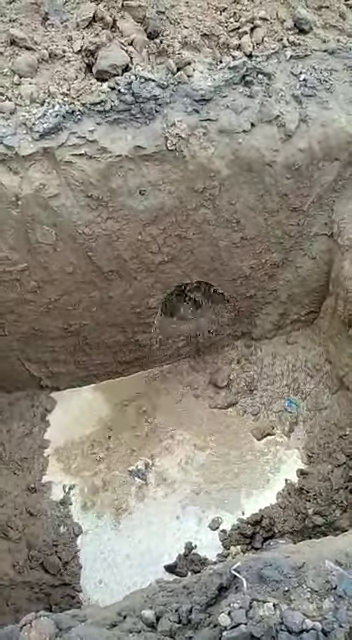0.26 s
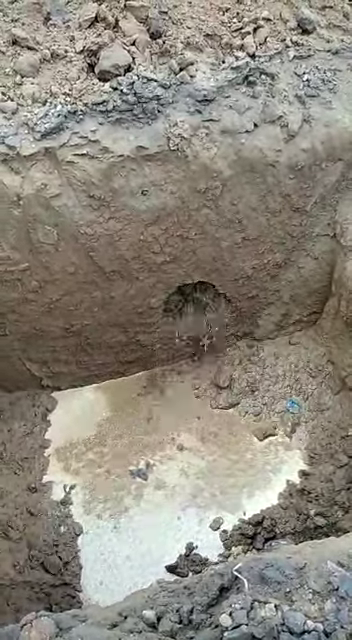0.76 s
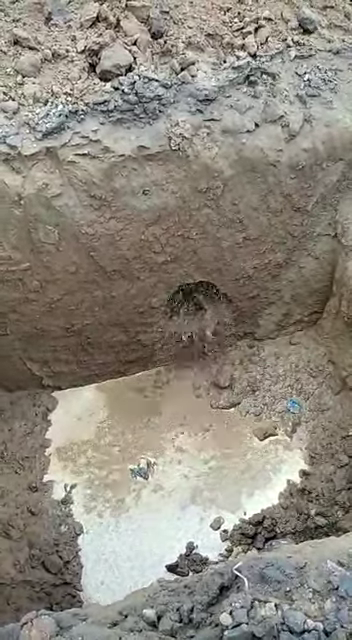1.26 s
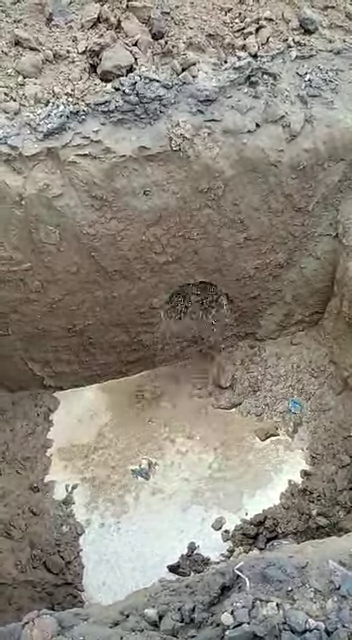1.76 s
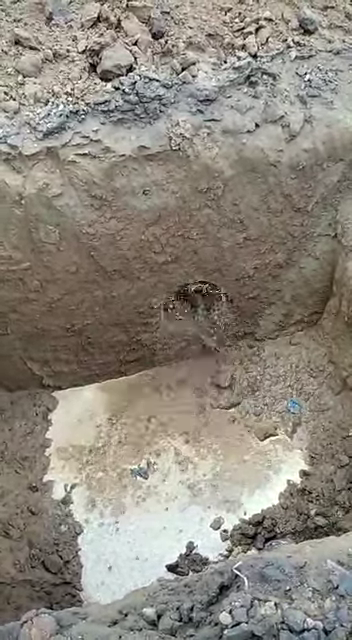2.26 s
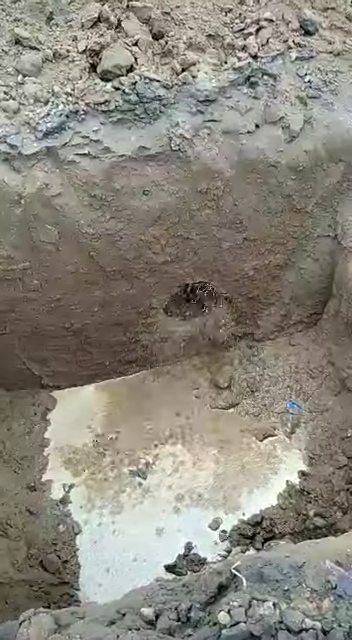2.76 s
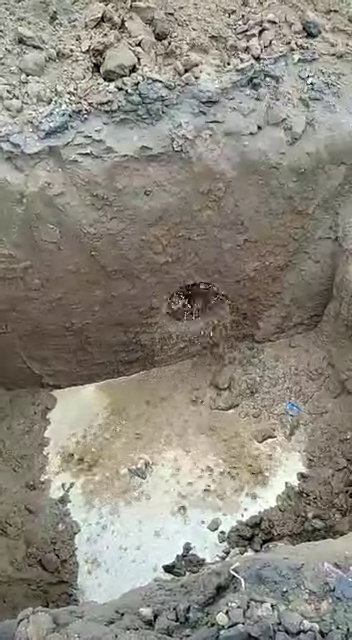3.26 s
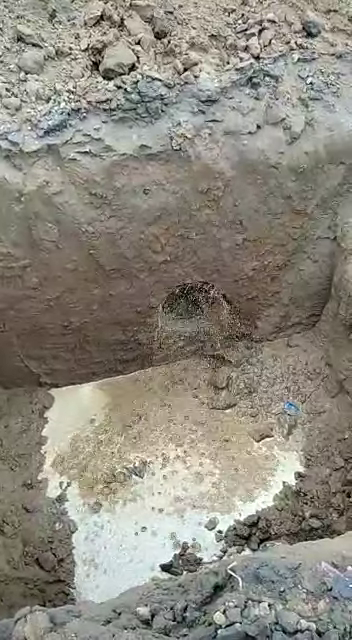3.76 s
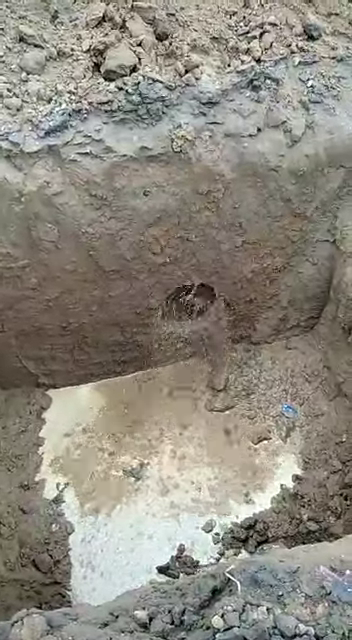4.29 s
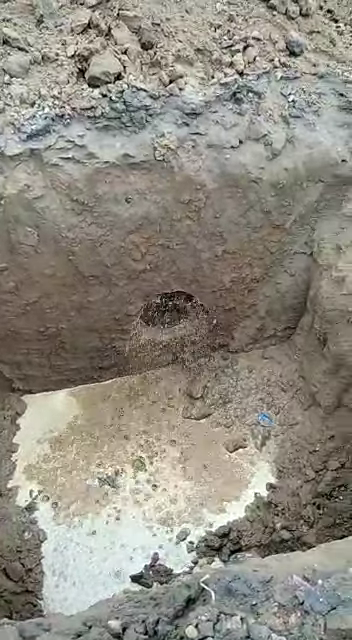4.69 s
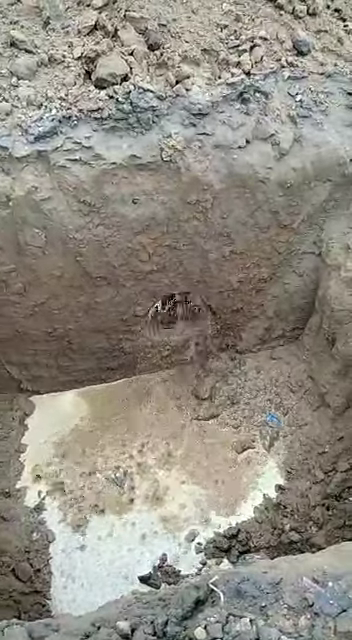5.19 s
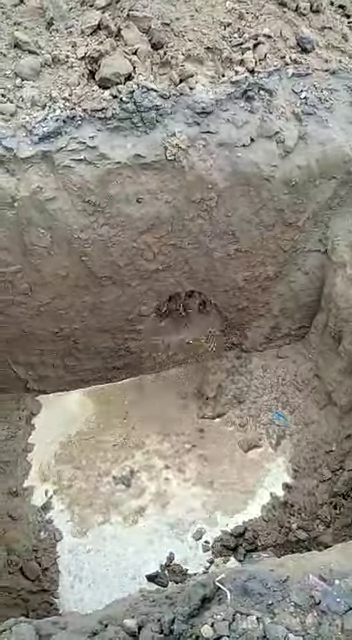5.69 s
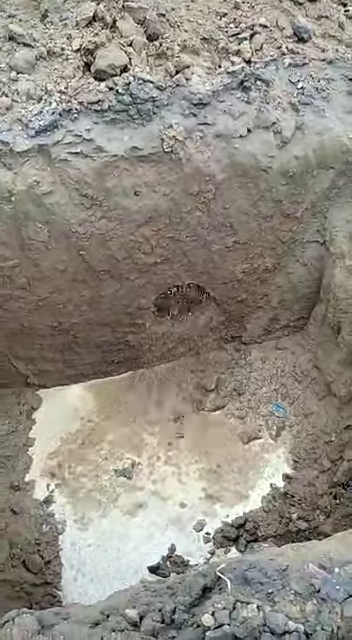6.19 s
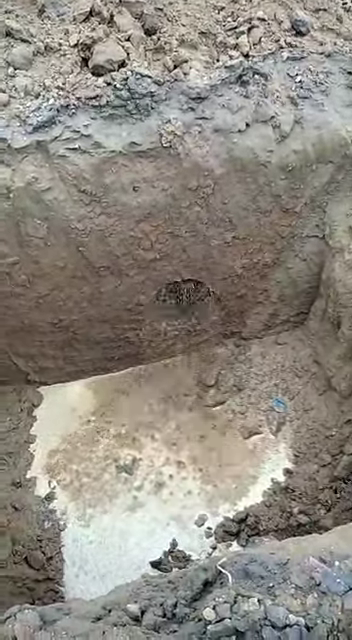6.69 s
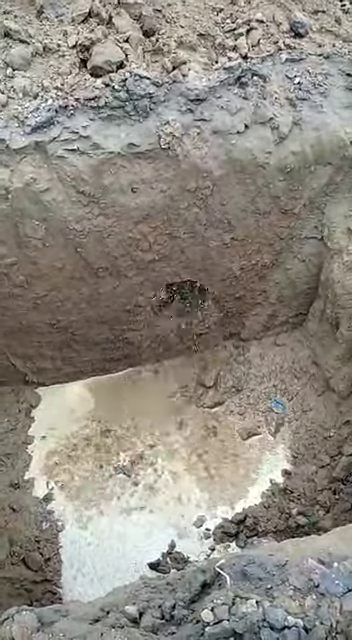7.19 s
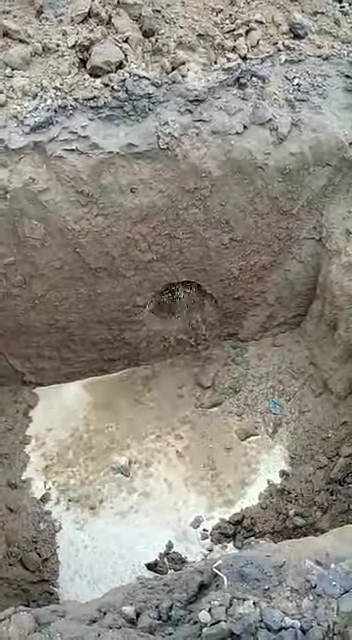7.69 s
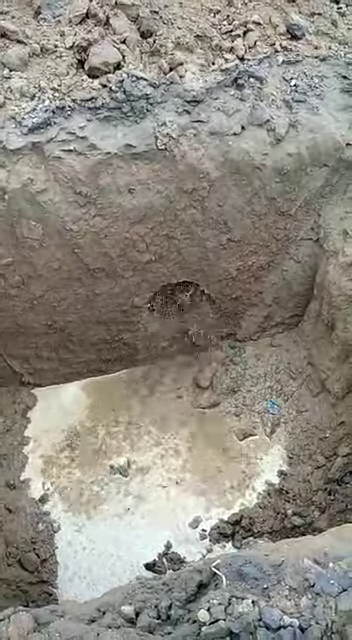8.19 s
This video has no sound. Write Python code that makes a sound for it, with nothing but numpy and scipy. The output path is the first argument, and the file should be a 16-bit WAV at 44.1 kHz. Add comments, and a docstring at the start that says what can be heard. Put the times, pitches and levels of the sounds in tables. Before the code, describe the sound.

Close above a muddy pit, a pneumatic hammer strikes about eleven times a second. Each stroke is a bright, spitting burst of air with a short hollow bark and a trailing wet spray, over a dull ground thud. Small drops and clods plop in a puddle. Around five seconds mud chokes the hole, the hiss drops away and a low boom swells, then the spitting returns. An engine hums steadily beneath broad outdoor noise.

```python
"""Boring hammer in a muddy pit

A pneumatic boring head hammers through wet ground about eleven times a second, heard from above its muddy pit.
Each stroke rings the soil (fading sine waves) and blows air out of the bore hole (shaped noise): a bark, a
spitting jet, then spray. Drops and clods plop in a puddle, with low knocks (short rising tones). Mud chokes the
hole for a moment and the ground booms after it, as a low noise. Wavering tones make an engine's hum over broad
roadside noise."""
import sys
import numpy as np
from scipy import signal
from scipy.fft import rfft, irfft
from scipy.io import wavfile
from scipy.ndimage import uniform_filter1d

SR = 44100
rng = np.random.default_rng(int(sys.argv[2]) if len(sys.argv) > 2 else 0)


def int16_out(signal):
    """Quantize to a 16-bit WAV file."""
    q = np.round(np.clip(np.atleast_2d(signal).T, -1, 1) * 32767)
    wavfile.write(sys.argv[1], SR, q.astype(np.int16))


N = 372644  # length of the scene, samples
PORT_LAG = 14  # samples by which the left microphone port hears the hole later than the right
PUFF_SIZE = 8192  # length of one puff, ring or bubble, samples
LEAD_S = .006  # room before the main burst for air that leaks early


def exhaust():
    """A puff of air for each stroke, as strong as the mud allows and never twice the same."""
    # air through the hole as mud narrows and clears it, before chance and the final trims in puff():
    # start_s, jet_db, spray_db, bark_db, brightness_db (of the hiss)
    mud_flow = [(0.02, -7.5, -26, -19.5, 1.5), (0.29, -12.5, -29, -25.5, -3), (0.38, -8, -24.5, -20, 1),
                (0.66, -12.5, -31.5, -23, -5.5), (1.12, -7.5, -21.5, -19.0, -4.5),
                (2.57, -11, -28.5, -23.5, -2.5), (3.2, -11.0, -27.5, -18.5, -1.5),
                (3.47, -11, -25.5, -30, -1), (3.65, -13.0, -31, -23.5, -2.5), (3.92, -10, -26, -26, 1),
                (4.64, -12.5, -30.5, -22.5, -1.5), (5.0, -26, -35.5, -22.5, -7),
                (5.18, -25, -38, -30.5, -3), (5.36, -13.0, -29.5, -21, -4.0), (5.99, -10, -25, -19.0, -1),
                (8.05, -8, -25, -20.5, 0.0), (8.23, -14.5, -33, -23, -4.0), (8.41, -7.5, -23, -20, 0.5)]
    # chance spread from one puff to the next, dB
    jet_spread, spray_spread, bark_spread, bright_spread, hollow_spread = 0.93, 1.24, 1.3, 2.34, 3.5
    hollow_middle_db = -0.8  # lowest resonances of the hole against its highest
    spray_t60_s, spray_t60_spread = 0.22, 0.23  # typical time to fall 60 dB; spread as a share of it
    out = np.zeros((2, N))
    flow = curve(mud_flow)
    for s in stroke_times():
        jet_db, spray_db, bark_db, bright_db = (c[int(s * SR)] for c in flow)
        push, wet, bark, bright, hollow, linger = rng.standard_normal(6)
        push_db = jet_spread * push  # a harder puff also throws more spray
        sound = puff(
            jet_db=jet_db + push_db,
            bright_db=bright_db + bright_spread * bright,
            bark_db=bark_db + bark_spread * bark,
            hollow_db=hollow_middle_db + hollow_spread * hollow,
            spray_db=spray_db + push_db + spray_spread * wet,
            spray_t60=spray_t60_s * np.exp(spray_t60_spread * linger))
        add(out, s - LEAD_S - .0005, sound)  # the burst begins half a millisecond before the stroke time
    return out


def puff(jet_db, bright_db, bark_db, hollow_db, spray_db, spray_t60):
    """One exhaust stroke: air leaks, the jet bursts through the mud, rings the hole and trails off as spray."""
    # colour of the jet's hiss: pitch_hz, level_db (relative)
    jet_colour = [(1000, -22.5), (3700, -20.5), (4750, -6.5), (5200, -1.5), (6400, 1), (7700, -1.5),
                  (8700, 0), (10500, -1.5), (12200, -2), (15300, -8.5)]
    # colour of the spray: pitch_hz, level_db (relative)
    spray_colour = [(400, -38), (900, -12.5), (1700, -8), (2800, -5.5), (4000, -8), (4850, -15), (5150, 1),
                    (7500, -1), (9200, 0), (10300, -4), (12400, 0), (15300, -8.5)]
    # resonances of the bore hole, before each puff shifts them: pitch_hz, width_hz (of one pass), level_db
    hole_modes = [(928, 210, -9.5), (1637, 370, 4), (2595, 757, -2.5)]
    t = np.arange(PUFF_SIZE) / SR - LEAD_S
    length, mouth, late = rng.standard_normal(3)

    # a choked, slow jet has a fuller middle
    choke = np.clip((-11 - jet_db) / 8, 0, 1)
    tint = [(3000, 4 * choke), (4200, 11 * choke),
            (5200, -bright_db / 2), (7500, -bright_db / 2), (11500, bright_db / 2)]
    hiss = shape(shape(spatter(grain_db=1.8), jet_colour), tint)
    jet = ripple(hiss, depth_db=3)
    leak = undb(-12.5) * swell(t + 0.006, rise=0.0074, hold=0, t60=0.0093)
    main_burst = swell(t, rise=0.0043, hold=0.0019 * np.exp(0.18 * length), t60=0.015)
    jet = burst(jet, leak + main_burst)

    # a hollow puff favours the lowest resonances; the mouth shifts them all in pitch
    air = shape(spatter(grain_db=3.0), [(1850, hollow_db / 2), (2250, -hollow_db / 2)])
    shift = np.exp(0.053 * mouth)
    bark = sum(undb(db) * resonate(air, hz * shift, width) for hz, width, db in hole_modes)
    bark = burst(bark, swell(t - .0005 - 0.0024 * late, rise=0.0023, hold=0.003, t60=0.071))

    wet_hiss = shape(shape(spatter(grain_db=3.2, channels=2), spray_colour), tint)
    spray = ripple(wet_hiss, depth_db=3.2)
    # the spray leaves in uneven gobs, and its low part dies first
    gobs = undb(1.3 * np.interp(t, np.linspace(0, t[-1], 32), rng.standard_normal(32)))
    spray = burst(spray * gobs, swell(t, rise=0.016, hold=0.01, t60=max(spray_t60, .05)))
    low_part = shape(spray, [(4800, 0), (5150, -42)])
    spray = spray - low_part * (1 - np.exp(-t / 0.12))

    jet_heard = undb(jet_db - 1.0) * in_pit(jet, scatter=0.83)
    bark_heard = undb(bark_db - 0.2) * in_pit(bark, scatter=0.45)
    return jet_heard + bark_heard + undb(spray_db + 5.0) * spray


def spatter(grain_db, channels=1, size=12):
    """Air full of droplets: noise in tiny grains (size in samples) of uneven strength."""
    grains = undb(grain_db * rng.standard_normal((channels, PUFF_SIZE // size + 1)))
    strength = np.repeat(grains, size, axis=1)[:, :PUFF_SIZE]
    return unit(rng.standard_normal((channels, PUFF_SIZE)) * strength)


def ripple(x, depth_db, count=48):
    """Random peaks and dips across the pitch range, drawn anew for each puff's hiss."""
    hz = np.linspace(800, 16000, count)
    return shape(x, np.column_stack([hz, depth_db * rng.standard_normal(count)]))


def burst(x, opening):
    """Noise let through an opening, with a set energy whatever its grain."""
    return unit(x * opening) * np.sqrt(np.mean(opening ** 2))


def in_pit(x, scatter):
    """The right port hears the hole first; the pit's walls give each port its own early echoes."""
    t = np.arange(PUFF_SIZE // 8) / SR
    walls = rng.standard_normal((2, len(t))) * swell(t, rise=0.00097, hold=0.00027, t60=0.052)
    walls = walls / np.sqrt(np.sum(walls ** 2) / 2)
    echoes = signal.fftconvolve(x, walls, axes=1)[:, :PUFF_SIZE]
    direct = np.vstack([np.roll(x, PORT_LAG), x])
    return (direct + scatter * echoes) / np.hypot(1, scatter)


def stroke_times():
    """One stroke, in seconds, each time the piston completes a cycle."""
    # pace of the piston, which labours briefly near the start: start_s, strokes_per_s
    piston_pace = [(0.0, 11.1552), (0.9, 10.644), (1.8, 11.1061), (2.4, 11.1635), (2.7, 11.1272),
                   (4.8, 11.1103), (5.1, 11.1682), (6.9, 11.1103), (8.45, 11.1806)]
    first_stroke_s = .0188
    cycles = np.cumsum(curve(piston_pace)[0]) / SR
    cycles = cycles - cycles[int(first_stroke_s * SR)]
    return np.interp(np.arange(int(cycles[-1]) + 1), cycles, np.arange(N) / SR)


def hammer():
    """Every stroke of the piston rings the same few ground modes, each a sine wave that dies away."""
    # what rings in the ground; the piston knocks again on its way back:
    # delay_s (counted from 6 ms before the stroke), pitch_hz, t60_s (fall by 60 dB), level_db (typical)
    ground_modes = [(.001, 81, 0.1, -33.5), (.001, 112, .12, -47), (.002, 273, 0.11, -41.5),
                    (.002, 158, 0.088, -43), (.03, 304, 0.083, -49), (.002, 216.6, 0.13, -45),
                    (.057, 244, 0.17, -39)]
    out = np.zeros(N)
    t = np.arange(PUFF_SIZE) / SR
    for s in stroke_times():
        for delay, hz, t60, db in ground_modes:
            ring = np.sin(2 * np.pi * hz * t) * swell(t, rise=0.0043, hold=0, t60=t60)
            add(out, s + delay - .006, undb(db + 0.9 * rng.standard_normal()) * ring)
    return out


def boom():
    """A low, rough rumble of the ground: noise around its deepest resonance."""
    noise = rng.standard_normal(N)
    low = resonate(noise, hz=73.4, width=63) + undb(-21) * resonate(noise, hz=70, width=62)
    # even out the strength over an eighth of a second
    strength = np.sqrt(uniform_filter1d(low ** 2, size=SR // 8) + 1e-18)
    quiet_db = -61  # level between the booms
    return low / strength * (undb(quiet_db) + booming()[0])


def booming():
    """Gains that the booms give to the rumble and to the engine's low hum."""
    # booms of the ground: start_s, rise_s, hold_s, t60_s (fall by 60 dB), rumble_db, hum_db (before its trim)
    boom_list = [(0.909, .035, .015, .14, -38, -50), (5.532, 0.22, 0.15, 0.57, -31, -24.5)]
    t = np.arange(N) / SR
    gains = np.zeros((2, N))
    for s, rise, hold, t60, rumble_db, hum_db in boom_list:
        gains += np.outer(undb([rumble_db, hum_db]), swell(t - s, rise, hold, t60))
    return gains


def puddle(count=500):
    """Drops and clods fall into the puddle, with low knocks among them: short tones that rise in pitch."""
    # clods plopping in, and low knocks near 250 Hz: start_s, pitch_hz (at first), level_db
    plops_and_knocks = [(1.041, 440, -30), (2.93, 860, -26.5), (3.47, 790, -31), (5.27, 926, -31),
                        (5.99, 930, -24), (6.22, 241, -38), (6.329, 253.6, -33), (6.519, 414, -29.5),
                        (6.55, 248, -35), (6.649, 266, -36), (6.99, 890, -29), (7.09, 932, -38),
                        (7.23, 244, -30), (7.256, 859, -22.5), (7.369, 252, -29), (7.70, 883, -26)]
    out = np.zeros((2, N))
    for when, pitch, size, side in rng.random((count, 4)):
        # most drops are small and quiet
        drop = undb(-43 + 11.0 * size ** 3) * bubble(hz=380 * 7 ** pitch, cycles=28)
        add(out, when * N / SR, np.outer(np.sqrt([side, 1 - side]), drop))
    for s, hz, db in plops_and_knocks:
        tone_burst = undb(db) * bubble(hz, cycles=18 + hz / 25)
        add(out, s, np.array([np.roll(tone_burst, PORT_LAG), tone_burst]))
    return out


def bubble(hz, cycles):
    """A pocket of air rings in the water and rises in pitch; cycles sets how long it rings."""
    turns = hz * np.arange(PUFF_SIZE) / SR
    rising = turns * (1 + 0.015 * turns / cycles)
    return np.sin(2 * np.pi * rising) * swell(turns, rise=1, hold=0, t60=cycles)


def engine():
    """Firing harmonics, a separate low hum that swells with the booms, and a thin whir that slows with the hum."""
    # engine speed, which dips and then climbs: start_s, firing_hz, level_db (added to each harmonic)
    engine_run = [(0, 45.96, 4.5), (.7, 44.67, 4), (2, 45.86, 2.5), (3, 46.05, 1.5), (4.4, 46.7, 2),
                  (6, 47.62, -1), (8.45, 48.23, -1)]
    # harmonics of the firing rate: multiple, level_db (before the engine's own level)
    harmonics = [(1, -62), (2, -46), (3, -51.5), (4, -58.5), (5, -62.5), (6, -70)]
    # pitch of the low hum before it wavers: start_s, pitch_hz
    hum_pitch = [(0, 78.9), (1, 78.05), (3, 77.92), (5, 77.3), (7, 75.17), (8.45, 75.15)]
    # swelling and fading of the hum before its trim: start_s, level_db
    hum_level = [(0, -36), (.9, -40.5), (1.8, -38), (3, -42.5), (3.7, -37.5), (4.8, -43), (5.4, -40.5),
                 (6.5, -48), (7.3, -41), (8.45, -44)]
    firing_hz, engine_db = curve(engine_run)
    firings = sum(tone(k * firing_hz, db + engine_db) for k, db in harmonics)
    hum_hz = curve(hum_pitch)[0]
    hum = tone(hum_hz, db=-0.5) * (undb(curve(hum_level)[0]) + booming()[1])
    whir = tone(4.19 * hum_hz, db=-54.0)
    return firings + hum + whir


def tone(hz, db):
    """A machine tone: a sine wave that wavers slightly in pitch and level."""
    wavering_hz = hz * (1 + 0.0016 * walk(6.24))
    phase = 2 * np.pi * (np.cumsum(wavering_hz) / SR + rng.random())
    return np.sqrt(2) * undb(db + 1.2 * walk(8)) * np.sin(phase)


def roadside():
    """Broad machine noise: much alike at both ports in the bass, more opposed near 500 Hz and 1.6 kHz."""
    # colour of the noise before mid and side are shaped: pitch_hz, level_db (relative)
    road_colour = [(20, -16), (35, -30), (50, 2.5), (90, -5), (125, -0.5), (190, -3.5), (260, -3),
                   (400, -5), (650, -10), (950, -2.5), (1400, -19.5), (2800, -19), (4700, -22.5),
                   (5300, -19.5), (15000, -24)]
    mid, side = shape(rng.standard_normal((2, N)), road_colour) * undb(1.92 * walk(12))
    mid = shape(mid, [(400, -2.5), (900, -6.5), (1500, 2)])
    side = shape(side, [(130, -11), (260, -13.5), (500, -2), (950, -8.5), (1600, 6), (4000, -4.0)])
    return undb(-37.5) * unit(np.array([mid + side, mid - side]))


def undb(db):
    """Decibels to gain."""
    return 10 ** (np.asarray(db) / 20)


def unit(x):
    """Scale to an average strength (rms) of 1."""
    return x / np.sqrt(np.mean(x ** 2))


def curve(table):
    """Each column of a table after the time column, joined by straight lines in time."""
    s, *columns = np.transpose(table)
    return [np.interp(np.arange(N) / SR, s, c) for c in columns]


def freqs(x):
    """Frequency in Hz of each spectral bin of x, at least 1."""
    return np.maximum(np.fft.rfftfreq(x.shape[-1], 1 / SR), 1)


def shape(x, points, power=1):
    """Colour x by (Hz, dB) points; power scales the decibels."""
    hz, db = np.transpose(points)
    gain_db = np.interp(np.log(freqs(x)), np.log(np.sort(hz)), db)
    return irfft(rfft(x) * undb(power * gain_db), x.shape[-1])


def resonate(x, hz, width):
    """A resonance applied twice, so that sound off its pitch falls away steeply."""
    f = freqs(x)
    one_pass = 1 + 1j * (f * f - hz * hz) / (f * width)
    return irfft(rfft(x) / one_pass ** 2, x.shape[-1])


def walk(rate):
    """Slow chance with a spread near 1: random steps, rate of them a second, smoothed twice."""
    k = int(SR / rate)
    steps = np.repeat(rng.standard_normal(N // k + 1), k)
    return 1.23 * uniform_filter1d(uniform_filter1d(steps, k), k)[:N]


def swell(t, rise, hold, t60):
    """A smooth opening, a hold, then an exponential fall by 60 dB in each t60."""
    opening = np.sin(np.pi / 2 * np.clip(t / rise, 0, 1)) ** 2
    return opening * undb(-60 * np.maximum(t - rise - hold, 0) / t60)


def add(out, s, x):
    """Mix x into out at time s, in seconds."""
    i = max(int(s * SR), 0)
    out[..., i:i + x.shape[-1]] += x[..., :max(N - i, 0)]


def scene():
    """The bore hole close by, the ground and the engine beneath it."""
    # drift of the exhaust from side to side: start_s, left_minus_right_db
    side_drift = [(0, -0.5), (1.2, -2), (2.5, -0.5), (3.7, -0.6), (4.25, 0.8), (5.2, -1.3), (6.2, -1.5),
                  (7.2, 0), (8.45, -0.5)]
    sway = undb(np.array([[.5], [-.5]]) * curve(side_drift)[0])
    return exhaust() * sway + hammer() + boom() + engine() + puddle() + roadside()


def record(dry):
    """The two microphone ports colour the sound differently; the top is cut steeply."""
    # contrast of left against right, applied only in part to each port: pitch_hz, level_db (before that scaling)
    port_colour = [(60, -10), (130, -0.5), (250, 3.5), (500, 1), (1000, 2.5), (3000, 1), (5300, -4),
                   (7000, -0.5), (8700, 2), (10300, 2.5), (12500, 14.5), (15000, 12)]
    left = shape(dry[0], port_colour, power=0.45)
    right = shape(dry[1], port_colour, power=-0.059)
    # the very loudest spits overload the microphone
    heard = np.clip(np.array([left, right]), -.85, .85)
    top_hz = 15750
    return signal.sosfilt(signal.ellip(10, .2, 70, top_hz, fs=SR, output="sos"), heard)


dry = scene()
out = record(dry)
int16_out(out)
```